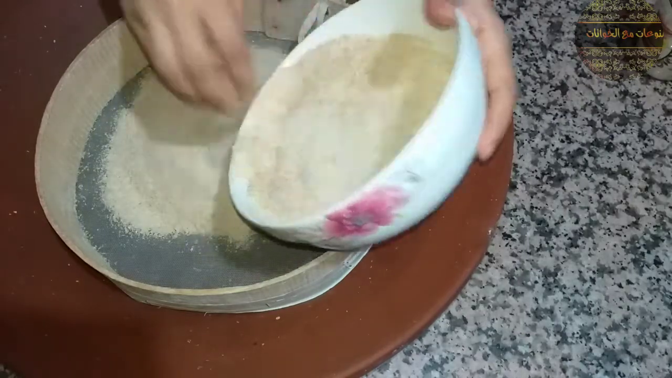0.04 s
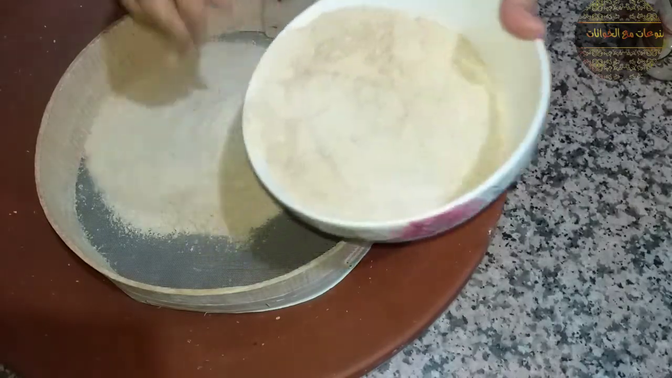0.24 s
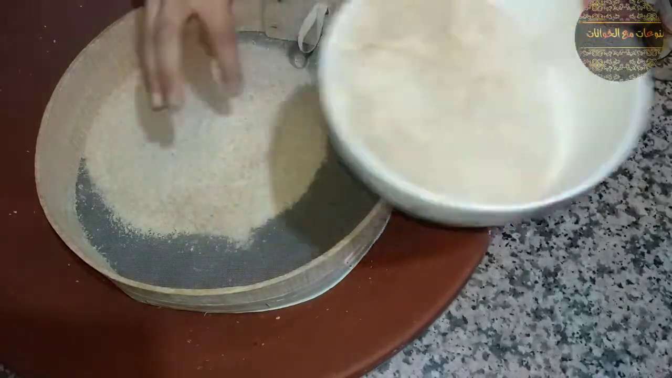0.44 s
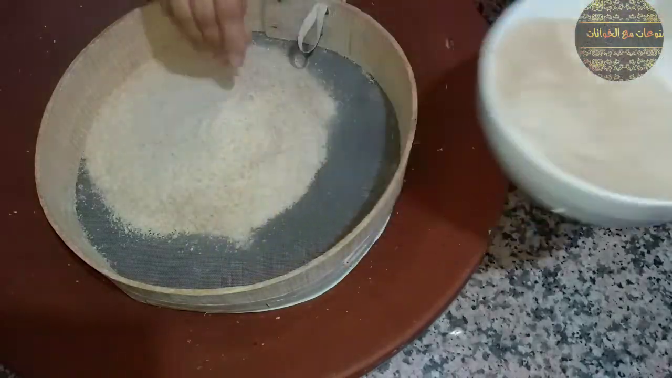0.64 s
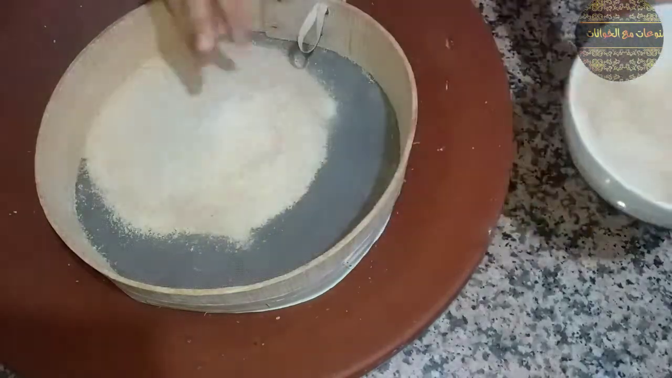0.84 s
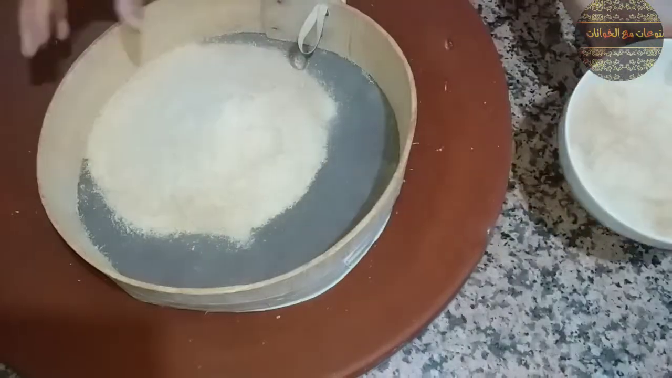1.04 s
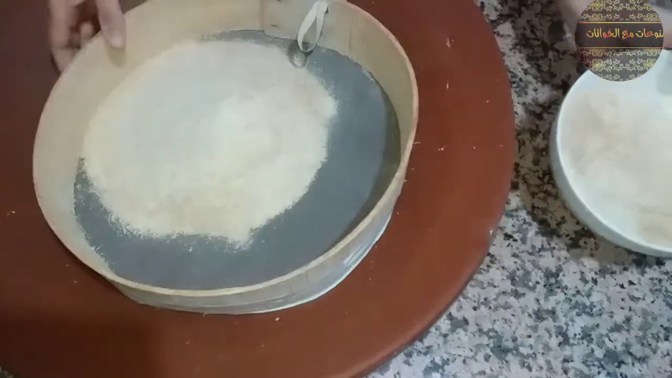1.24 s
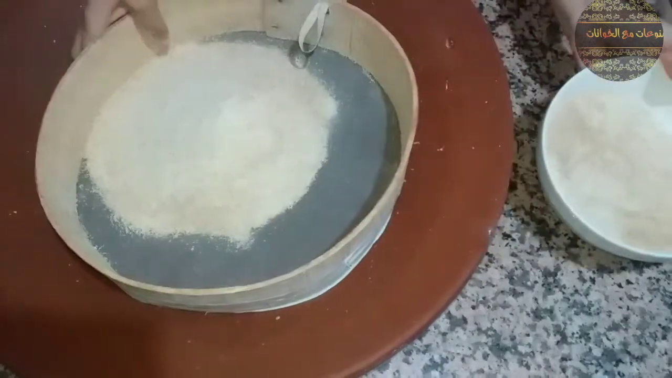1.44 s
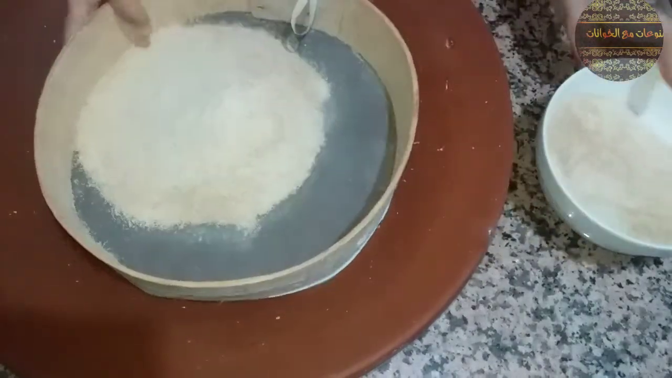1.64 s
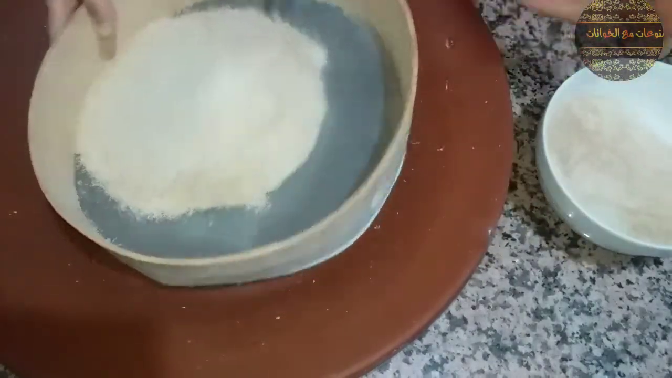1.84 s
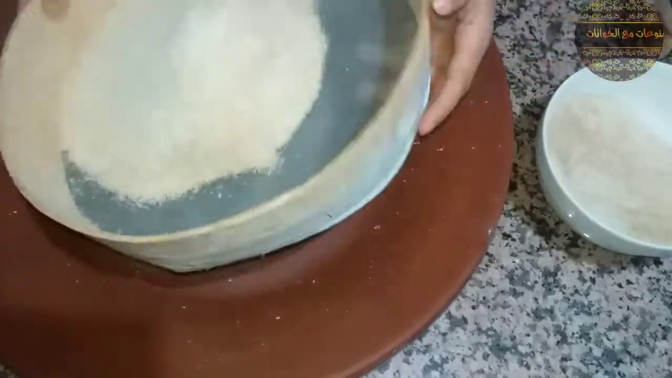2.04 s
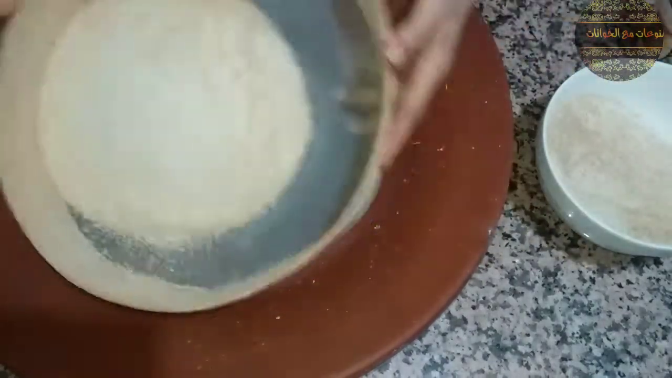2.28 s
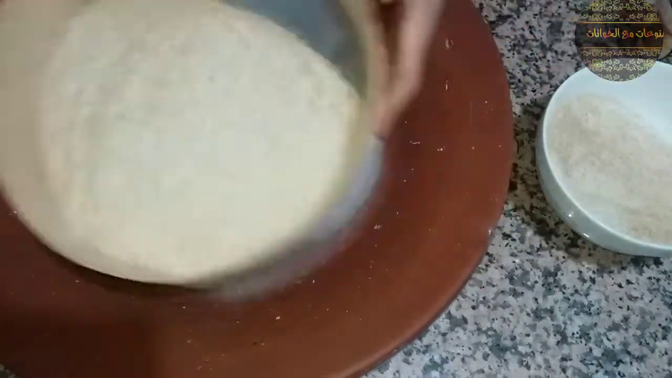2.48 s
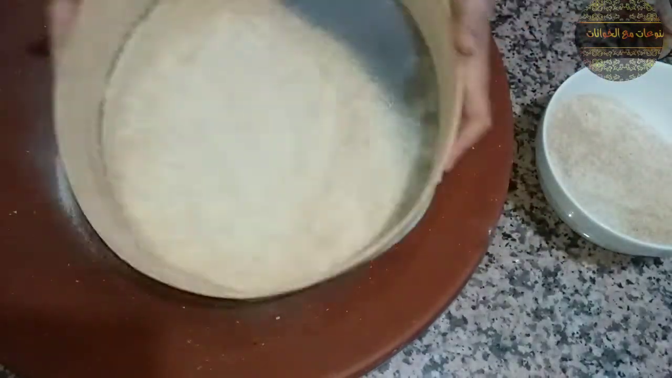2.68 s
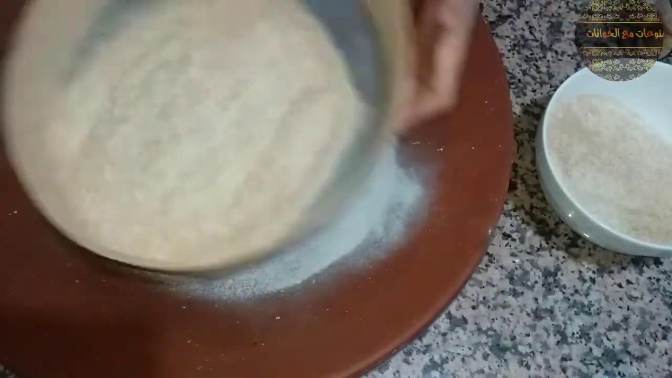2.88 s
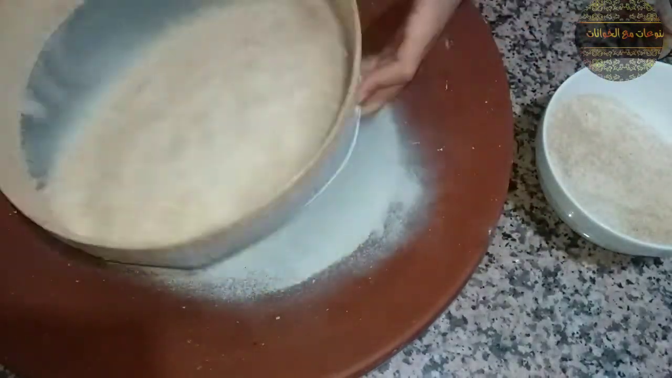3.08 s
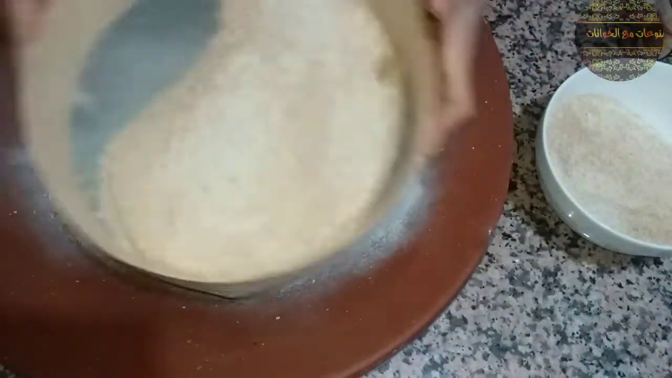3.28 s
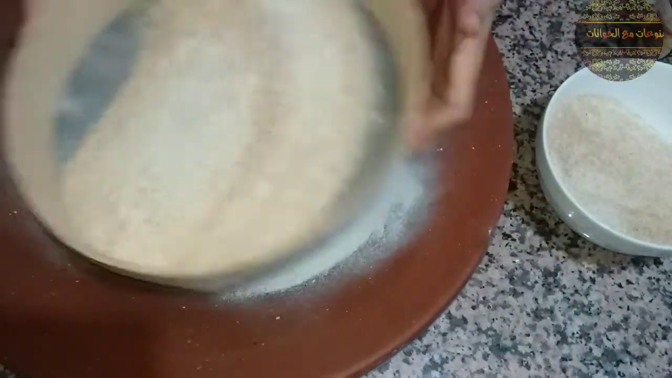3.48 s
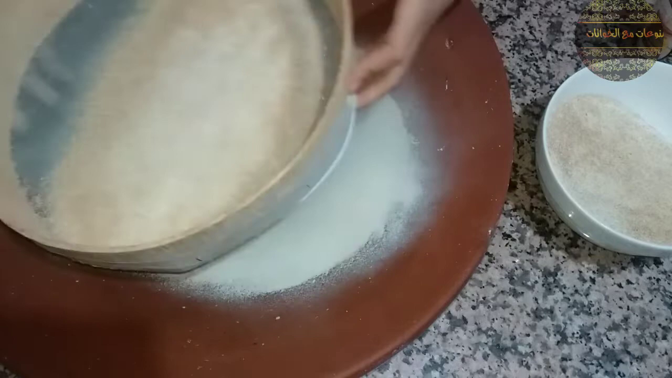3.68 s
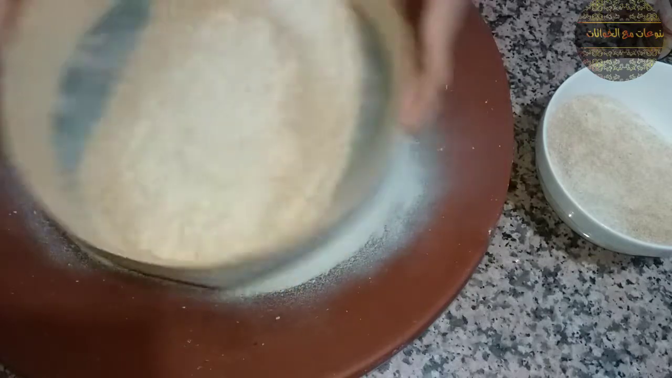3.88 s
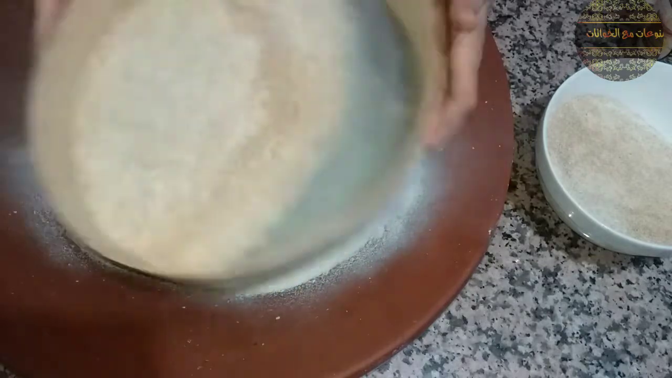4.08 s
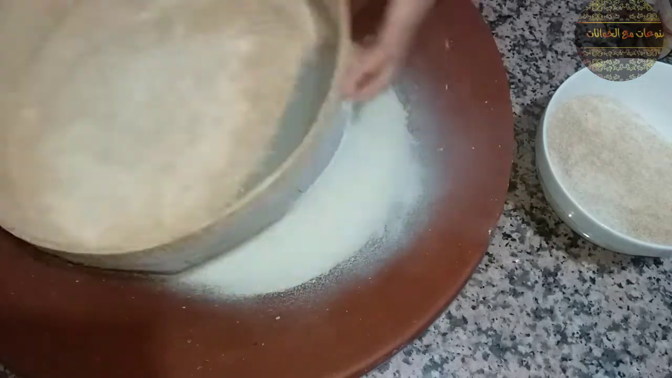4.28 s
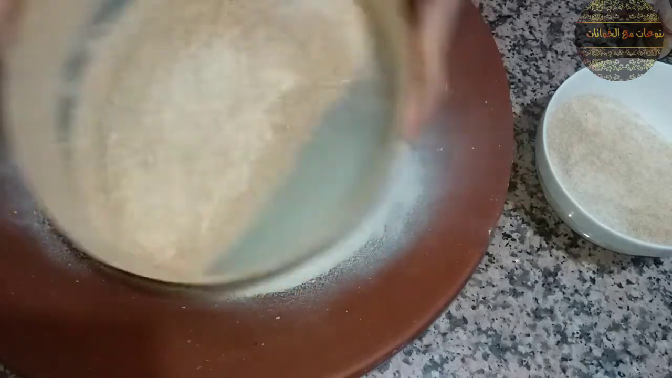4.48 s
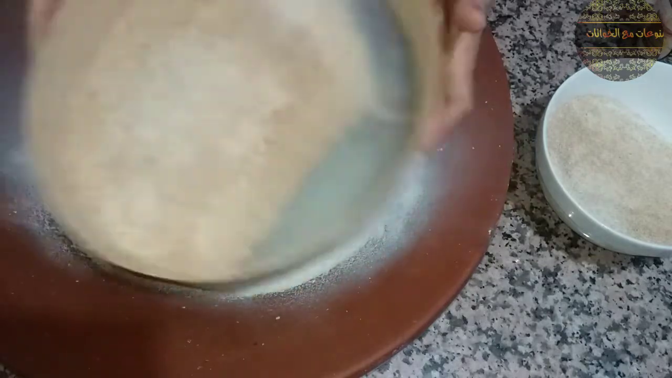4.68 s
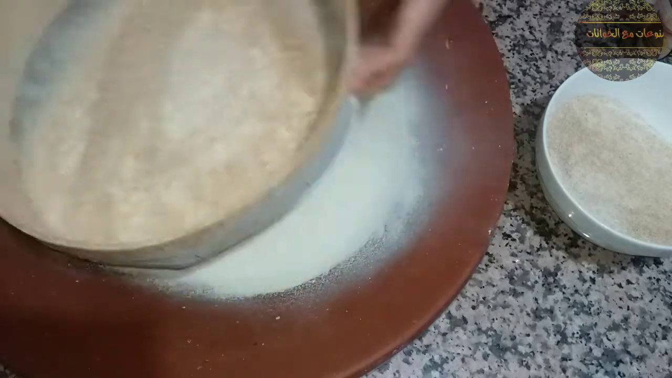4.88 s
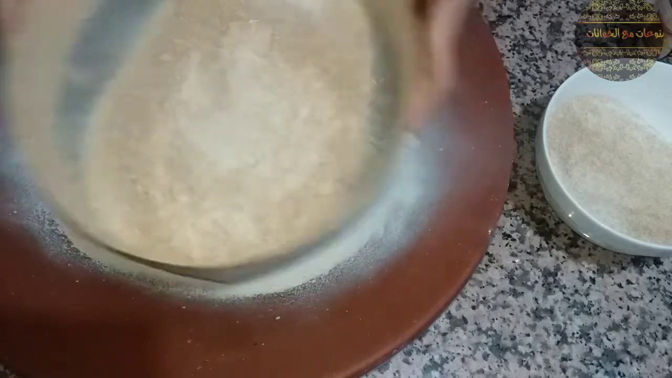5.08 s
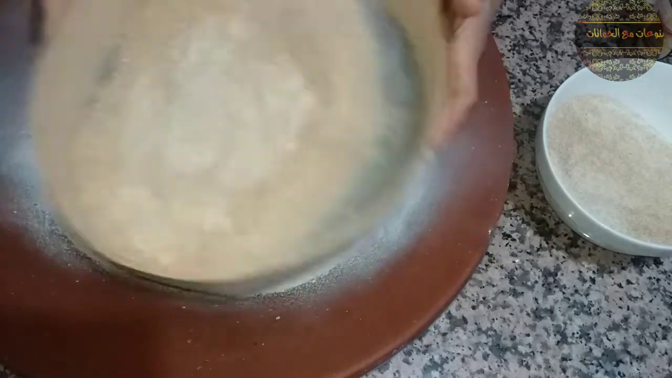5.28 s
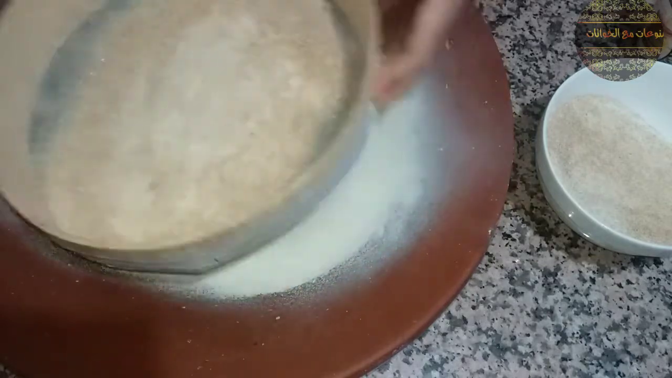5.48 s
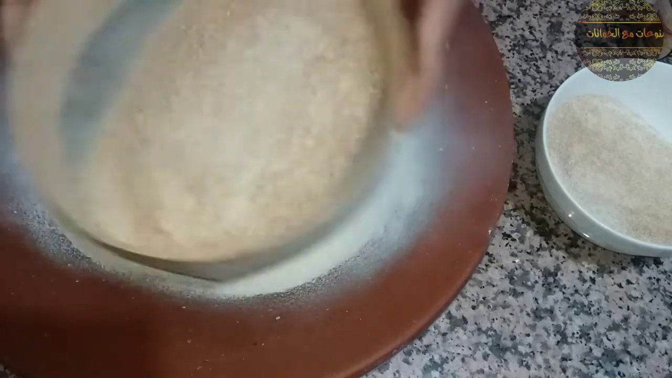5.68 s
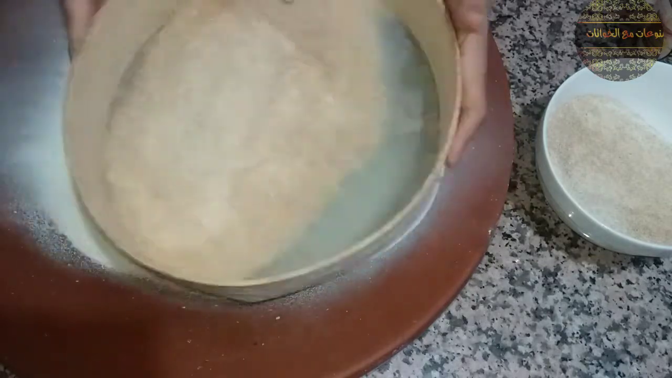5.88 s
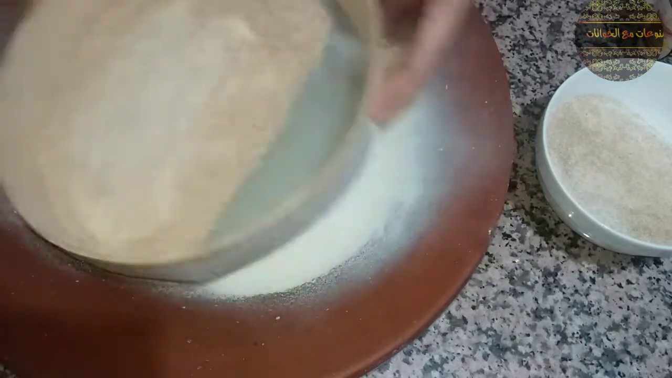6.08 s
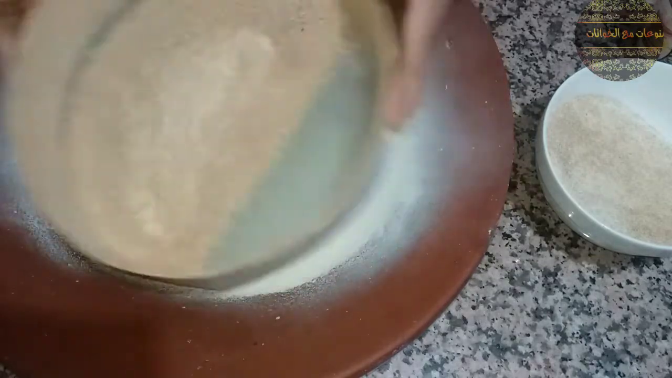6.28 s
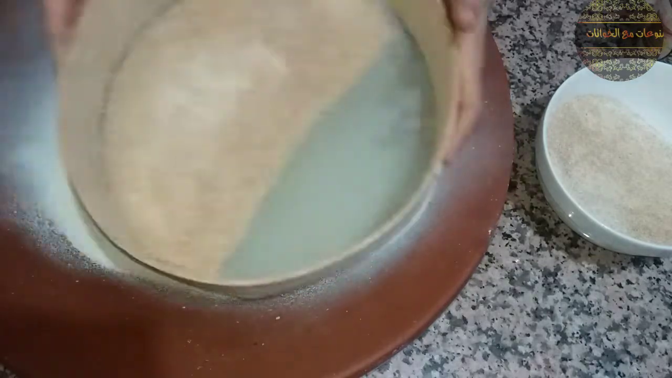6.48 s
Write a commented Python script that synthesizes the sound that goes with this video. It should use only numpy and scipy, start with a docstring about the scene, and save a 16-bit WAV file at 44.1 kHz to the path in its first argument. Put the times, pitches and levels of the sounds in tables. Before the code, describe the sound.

Two solid knocks of a bowl being set down, followed by rhythmic wooden clacks and swishing as flour is sifted in a small kitchen.

```python
"""A faint appliance hum and soft brushing of flour, then two knocks: a china bowl is set on a stone worktop.
Each impact excites the modes of the stone and the glaze. A wooden sieve bumps its dish as it is lifted
and is shaken from hand to hand about three times a second. Friction of flour on the mesh makes a hiss
that follows the speed, and the hoop clacks against the hand once a shake.
One close microphone hears it all in a small kitchen."""
import sys
import numpy as np
from scipy import signal
from scipy.fft import rfft, irfft
from scipy.io import wavfile
from scipy.ndimage import uniform_filter1d

SR = 44100
rng = np.random.default_rng(int(sys.argv[2]) if len(sys.argv) > 2 else 0)


def transcribe(signal):
    """Save signal, clipped to [-1, 1], as a 16-bit WAV file at the path in sys.argv[1]."""
    frames = np.atleast_2d(signal).T
    limited = np.clip(frames, -1, 1)
    pcm = np.round(limited * 32767).astype(np.int16)
    wavfile.write(sys.argv[1], SR, pcm)


N = 287973
TIME = np.arange(N) / SR

# Levels in the tables are relative; each source adds its own gain.
# shakes, each begun by a clack: start_s, clack_db, chatter_s, hollow_db, rim_db, push_db, pull_db
SHAKES = [(2.2516, -19, 0.0016, -41, -25.5, -53.5, -55.5), (2.553, -31.5, 0.0056, -30, -44, -54, -51),
          (2.828, -24, 0.0063, -23, -38, -54, -47), (3.1218, -20.5, 0.0053, -18.5, -12, -49, -48.5),
          (3.406, -17.5, 0.0036, -23, -13, -48, -47.5), (3.7, -17.5, 0.004, -23, -30, -45, -49.5),
          (3.9898, -17.5, 0.0025, -19.5, -10.5, -44.5, -46),
          (4.2888, -18.5, 0.0076, -26.5, -18, -46, -47.5), (4.59, -21.5, 0.0066, -24.5, -19, -46, -46.5),
          (4.8847, -22, 0.0048, -23, -14, -47, -49), (5.1918, -20.5, 0.0034, -26, -32, -47.5, -49),
          (5.4816, -19.5, 0.0026, -25.5, -16, -49.5, -48.5), (5.782, -25.5, 0.0033, -21, -13, -46, -50.5),
          (6.071, -23, .003, -24, -15.5, -47, -49.5), (6.366, -21.5, 0.0037, -26.5, -24, -49, -47)]
# fingers brushing flour and handling the sieve: start_s, length_s, slide_db, spray_db
RUSTLES = [(0.104, 0.18, -66, -63), (0.413, 0.031, -61.5, -58.5), (0.645, 0.21, -62.5, -64),
           (1.337, 0.12, -51, -63), (1.44, 0.1, -53.5, -51), (1.506, 0.18, -50.5, -59),
           (1.72, 0.073, -52.5, -58), (1.961, 0.26, -55, -61), (2.257, 0.06, -48, -58),
           (2.626, 0.0031, -46, -38)]
# spectra of flour sliding over the mesh and spraying through it: frequency_hz, level_db
SLIDE_SPECTRUM = [(200, -11.5), (700, -12.5), (1300, -9), (2300, -5), (3100, -1.5), (4000, 2), (4500, 1.5),
                  (5100, 2), (6300, -2), (8000, 2.5), (9000, -8), (16000, -15)]
SPRAY_SPECTRUM = [(2000, -13), (7000, -33), (8500, -9), (9400, -2.5), (11500, 3.5), (13000, 1.5),
                  (15500, 0.5)]
# strength of the scrape before a clack, greater while the grip is loose: time_s, level_db
SCRAPE_CURVE = [(4.3, -24), (5.2, -8.5), (6.07, -7.5), (6.36, -17)]
# light finger taps on the hoop: start_s, level_db, hollow_db
FINGER_TAPS = [(1.9986, -35, -13.5), (5.3467, -37, -16.5), (5.631, -38.5, -19), (6.218, -31, -18),
               (6.4929, -35, -19)]
# responses of the hoop's thin wood, hollow and rim: frequency_hz, level_db
WOOD_SPECTRUM = [(300, -51), (1500, -9.5), (2600, -5), (3900, 2), (4500, -1), (5200, 2), (6400, -1.5),
                 (7600, 0.5), (9100, -11), (10500, -6), (13000, -7.5), (16000, -12)]
HOLLOW_SPECTRUM = [(60, -31), (200, -13), (600, 1), (900, -1), (1400, 6.5), (1900, 4.5), (3000, 4.5),
                   (16000, -93.5)]
RIM_SPECTRUM = [(300, -55.5), (1400, -10.5), (1850, -5.5), (2160, 3), (2400, 1), (2700, 6.5), (3300, -4),
                (6000, -26)]
# the bowl's foot lands and rocks flat: start_s, level_db, cutoff_hz, crack_db, ring_db
BOWL_KNOCKS = [(1.2031, -0.5, 1420, -27, 0.5), (1.2083, -18, 1100, -42, -6), (1.6362, 0.5, 2480, -18.5, 2),
               (1.6494, -9, 1100, -37, -6)]
# hard touches on the glaze: start_s, level_db
GLAZE_CHINKS = [(1.2037, -35), (1.637, -13), (2.2519, -25), (5.3095, -34.5)]
# the hoop bumps the dish under it: start_s, level_db, ring_db
DISH_BUMPS = [(2.001, -43, -14), (2.3071, -17.5, -1.5), (3.125, -33.5, -3), (5.212, -34, -22)]
# impact spectra of bowl on worktop and hoop on dish: frequency_hz, level_db
THUD_SPECTRUM = [(30, -35), (85, -13), (125, -0.5), (260, 1.5), (450, 2.5), (700, 2.5), (1050, 1.5),
                 (1500, -2), (2200, -3.5), (2700, -3.5), (8200, -6), (9400, -4.5), (16000, -10)]
BUMP_SPECTRUM = [(50, -40), (130, -5.5), (300, 1), (550, -4.5), (780, -12.5), (1000, 0.5), (1350, -14.5),
                 (1650, -3), (2200, -20.5), (3200, -14), (5000, -24), (16000, -49)]
# normal modes of worktop, china and dish: pitch_hz, level_db, t60_s
WORKTOP_MODES = [(125.6, -12, 0.58), (209.3, 0, 0.25), (299, -18, 0.47), (365, 0, 0.16), (437, -22, 0.37),
                 (517, 2, 0.14), (585, -31, 0.34), (549, -7, 0.2), (812, -7, 0.24), (821, -17, 0.45),
                 (857, -7.5, 0.37), (1060, 0.5, 0.14), (1140, -21, 0.34), (1240, -14, 0.18),
                 (1397, -10, 0.21), (1540, -12.5, 0.28), (1674, -27, 0.55), (1880, -30, 0.29),
                 (1986, -35, 0.15), (2121, -39, 0.77), (2120, -53, 0.34), (2358, -38, 0.24),
                 (2370, -45, 0.31), (2950, -41, 0.11), (2815, -49, 0.25), (3100, -35, 0.34)]
CHINA_MODES = [(2170, 1, 0.013), (3560, -27, 0.0074), (4900, -2, 0.0081), (7670, 2, .014), (8250, -4, .016),
               (8450, -5, .01), (8830, -10.5, 0.02), (9900, -16, 0.025), (11640, -5, 0.014),
               (12700, -17, 0.014), (14000, -11, .01), (15250, -13, .014)]
DISH_MODES = [(221.3, -12.5, 0.4), (326, -12, 0.13), (505, -10, 0.17), (992, 3, 0.097), (1430, -21, .15)]
# the kitchen's reverberation time: frequency_hz, t60_s
KITCHEN_DECAY = [(100, 0.89), (250, 0.35), (600, 0.42), (1200, 0.39), (2500, 0.25), (5000, 0.48),
                 (9000, 0.2), (16000, 0.41)]
# noise bands of the appliance: centre_hz, nominal_width_hz, level_db
HUM_BANDS = [(65.5, 7.1, -73.5), (140.1, 2.6, -69.5), (244.6, 13, -72.5), (315, 12, -74),
             (459, 18.5, -65.5), (541, 12, -74.5), (677, 11, -80.5), (1076, 53, -71), (1152, 12, -80.5),
             (1726, 78, -72.5), (1838, 60, -73), (3160, 320, -78), (6370, 130, -70)]
# steady air noise: frequency_hz, level_db
AIR_SPECTRUM = [(25, -45), (60, -11), (110, 1), (165, 0), (270, -7.5), (400, -1.5), (800, -20.5),
                (1400, -17), (2500, -23), (3400, -19), (5800, -21.5), (8100, -17), (9000, -27.5),
                (15500, -27.5)]


def flour(spray_db=-2.5, grain_db=1.0, flutter_db=0.88):
    """Granular friction: countless grains rub over the mesh; the finest spray through, hissing brighter."""
    slide = shaking(turn_db=-5.5)
    spray = amp(spray_db) * shaking(turn_db=-7.5)  # stops more fully at the turns
    levels = np.array([slide, spray])
    for start_s, length_s, *rustle_db in RUSTLES:
        swell = np.sin(np.pi * np.clip((TIME - start_s) / length_s, 0, 1))
        levels = np.hypot(levels, amp(rustle_db)[:, None] * swell)
    out = np.zeros(N)
    flutter = unit_rms(uniform_filter1d(rng.standard_normal(N), size=500))  # the heap slips in small lumps
    for level, spectrum, trim_db in zip(levels, (SLIDE_SPECTRUM, SPRAY_SPECTRUM), (0.3, -0.7)):
        grains = rng.standard_normal(N) * amp(grain_db * rng.standard_normal(N))
        out += level * amp(trim_db + flutter_db * flutter) * coloured(grains, spectrum)
    return out


def shaking(turn_db, push_share=0.55, last_shake_s=0.306, speed_power=0.78):
    """Friction noise grows with speed: its envelope peaks mid-stroke and sinks to turn_db at each turn."""
    starts, *_, push_db, pull_db = np.transpose(SHAKES)
    lengths = np.append(np.diff(starts), last_shake_s)
    pull_starts = starts + push_share * lengths
    turns = np.append(np.column_stack([starts, pull_starts]), starts[-1] + last_shake_s)
    stroke = np.interp(TIME, turns, np.arange(len(turns)))
    effort_db = np.column_stack([push_db, pull_db]).ravel()
    stroke_index = np.minimum(stroke.astype(int), len(effort_db) - 1)
    effort = uniform_filter1d(amp(effort_db)[stroke_index], size=SR // 25)
    speed = abs(np.sin(np.pi * stroke))
    floor = amp(turn_db)
    return effort * (floor + (1 - floor) * speed ** speed_power) * (TIME > starts[0])


def hoop(rise_s=0.00088, fall_s=0.0017, scrape_s=0.0041, tap_chatter_s=0.0014, tap_rim_db=-11.5):
    """Contact chatter: each clack or tap is a burst of tiny collisions exciting wood, hollow and rim."""
    out = np.zeros(N)
    lead_s = 0.01
    t = np.arange(SR // 40) / SR - lead_s
    wood, hollow, rim = map(shaped_pulse, (WOOD_SPECTRUM, HOLLOW_SPECTRUM, RIM_SPECTRUM))
    clacks = [(*shake[:5], amp(np.interp(shake[0], *np.transpose(SCRAPE_CURVE)))) for shake in SHAKES]
    taps = [(start_s, db, tap_chatter_s, hollow_db, tap_rim_db, 0) for start_s, db, hollow_db in FINGER_TAPS]
    for start_s, db, chatter_s, hollow_db, rim_db, scrape_gain in clacks + taps:
        scrape = scrape_gain * (t > -scrape_s) * (t < 0)
        chatter = np.clip(t / rise_s, 0, 1) * np.exp(-np.maximum(t - chatter_s, 0) / fall_s)
        hits = (scrape + chatter) * rng.standard_normal(len(t)) * amp(3.2 * rng.standard_normal(len(t)))
        bodies = ((wood, 0), (hollow, hollow_db + 16), (rim, rim_db + 9.5))
        clack = sum(amp(body_db) * unit_energy(signal.fftconvolve(hits, body)) for body, body_db in bodies)
        add(out, start_s - lead_s, amp(db + 13.5) * clack)
    return out + amp(-5) * kitchen(out, delay_s=0.0054, early_db=0, early_s=0.025)


def bowl():
    """Impact excitation: each knock is a thud with a crack, and the worktop rings on in its modes."""
    blows, rings = np.zeros((2, N))
    for start_s, db, cutoff_hz, crack_db, ring_db in BOWL_KNOCKS:
        add(blows, start_s, amp(db + 9) * contact_pulse(cutoff_hz, crack_db))
        add(rings, start_s, amp(db + ring_db - 21) * ring(WORKTOP_MODES, rise_s=0.0036))
    reflections = amp(1.5) * kitchen(blows, delay_s=0.0031, early_db=-5, early_s=0.044)
    return blows + rings + reflections + far_rooms(blows)


def contact_pulse(cutoff_hz, crack_db):
    """A contact acts as a low-pass filter: the softer, the duller the thud. A weak crack reaches higher."""
    def gain_at(hz):
        thud = 1 / np.hypot(1, (hz / cutoff_hz) ** 5.1)
        crack = amp(crack_db) / np.hypot(1, (hz / (5.4 * cutoff_hz)) ** 7.3)
        return amp(value_at(THUD_SPECTRUM, hz)) * np.hypot(thud, crack)
    return unit_energy(causal_pulse(gain_at))


def glaze():
    """Damped free vibration: high modes of glazed ware die quickly and the room carries the chink on."""
    out = np.zeros(N)
    for start_s, db in GLAZE_CHINKS:
        add(out, start_s, amp(db - 8.5) * ring(CHINA_MODES, rise_s=0.00013))
    return out + amp(-3) * kitchen(out, delay_s=0.0078, early_db=6, early_s=0.018)


def dish():
    """Resonance after impact: the hoop bumps the dish, which rings unless the two stay in touch."""
    blows, rings = np.zeros((2, N))
    for start_s, db, ring_db in DISH_BUMPS:
        add(blows, start_s, amp(db + 12) * shaped_pulse(BUMP_SPECTRUM))
        add(rings, start_s, amp(db + ring_db - 10.5) * ring(DISH_MODES, rise_s=0.00078))
    return blows + rings + amp(-1) * kitchen(blows, delay_s=0.00066, early_db=11, early_s=0.013)


def kitchen(x, delay_s, early_db, early_s):
    """Reverberation: early reflections off worktop and walls lead into a tail that decays band by band."""
    t = np.arange(SR) / SR
    echoes = rng.choice([-1., 1.], SR) * (rng.random(SR) < 0.1) * (t > delay_s)
    hz, frame_s, bands = signal.stft(echoes, SR, nperseg=256)
    decay = amp(-60 * frame_s / value_at(KITCHEN_DECAY, hz)[:, None])
    tail = signal.istft(bands * decay, SR, nperseg=256)[1][:SR]
    spectrum = rfft(tail * (1 + amp(early_db) * np.exp(-t / early_s)))
    # the walls return about the same energy in every broad band
    band_rms = np.sqrt(uniform_filter1d(abs(spectrum) ** 2, size=70) + 1e-12)
    response = irfft(spectrum / band_rms, SR) * (t > delay_s) * (t < 0.8)
    return signal.oaconvolve(x, unit_energy(response))[:N]


def far_rooms(x, level_db=-24, t60_s=1.7, cutoff_hz=500):
    """Coupled rooms: the rest of the house returns a faint, dark, longer echo."""
    t = np.arange(SR) / SR
    dark_noise = signal.sosfilt(signal.butter(1, cutoff_hz, fs=SR, output="sos"), rng.standard_normal(SR))
    echo = signal.oaconvolve(x, dark_noise * amp(-60 * t / t60_s))[:N]
    return amp(level_db) * np.std(x) * unit_rms(echo)


def room_tone(air_db=-58.5):
    """Stationary noise: narrow bands make the appliance's blurred hum, a broad spectrum the air."""
    hz = np.fft.rfftfreq(N, 1 / SR)
    hum = np.zeros(N)
    for centre_hz, width_hz, db in HUM_BANDS:
        peak = 1 / (1 + (1.6 * (hz - centre_hz) / width_hz) ** 2)
        hum += amp(db) * unit_rms(irfft(rfft(rng.standard_normal(N)) * peak, N))
    return hum + amp(air_db) * coloured(rng.standard_normal(N), AIR_SPECTRUM)


def ring(modes, rise_s):
    """Modal synthesis: a sum of decaying sinusoids that builds up over rise_s."""
    t = np.arange(SR) / SR
    tones = sum(amp(db - 60 * t / t60) * np.sin(2 * np.pi * (hz * t + rng.random())) for hz, db, t60 in modes)
    return tones * (1 - np.exp(-t / rise_s))


def causal_pulse(gain_at, size=4096):
    """Minimum phase: the Hilbert transform of the log gain gives the phase of a causal pulse."""
    log_gain = np.log(gain_at(abs(np.fft.fftfreq(size, 1 / SR))) + 1e-6)
    spectrum = np.exp(np.conj(signal.hilbert(log_gain)))
    return np.fft.ifft(spectrum).real[:size // 2]


def shaped_pulse(spectrum):
    """Impulse response of energy 1 with a tabled spectrum."""
    return unit_energy(causal_pulse(lambda hz: amp(value_at(spectrum, hz))))


def coloured(x, spectrum):
    """Linear filtering by a tabled spectrum, scaled to rms 1."""
    gain = amp(value_at(spectrum, np.fft.rfftfreq(N, 1 / SR)))
    return unit_rms(irfft(rfft(x) * gain, N))


def value_at(table, hz):
    """Interpolation on a log-frequency axis."""
    table_hz, values = np.transpose(table)
    return np.interp(np.log(hz + 1), np.log(table_hz + 1), values)


def amp(db):
    """Amplitude ratio from decibels."""
    return 10 ** (np.asarray(db) / 20)


def unit_rms(x):
    """Normalisation to rms 1."""
    return x / np.sqrt(np.mean(x ** 2) + 1e-20)


def unit_energy(x):
    """Normalisation to energy 1."""
    return x / (np.linalg.norm(x) + 1e-20)


def add(mix, start_s, sound):
    """Superposition of a sound on the mix from start_s."""
    part = mix[round(start_s * SR):][:len(sound)]
    part += sound[:len(part)]


def scene():
    """Superposition: all sources sum at one microphone, alike in both channels."""
    mix = bowl() + glaze() + dish() + hoop() + flour() + room_tone()
    return np.array([mix, mix])


def record(dry):
    """Clipping at full scale, then band limiting at 15.6 kHz."""
    low_pass = signal.firwin(511, 15600, window=("kaiser", 9), fs=SR)
    return signal.oaconvolve(np.clip(dry, -1, 1), low_pass[None], "same")


dry = scene()
out = record(dry)
transcribe(out)
```